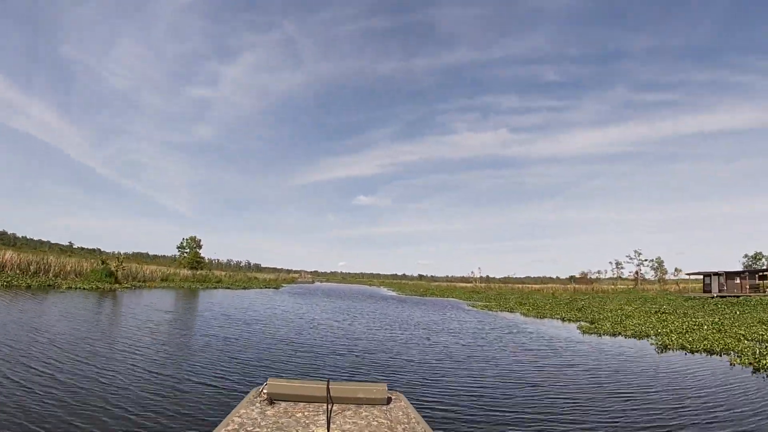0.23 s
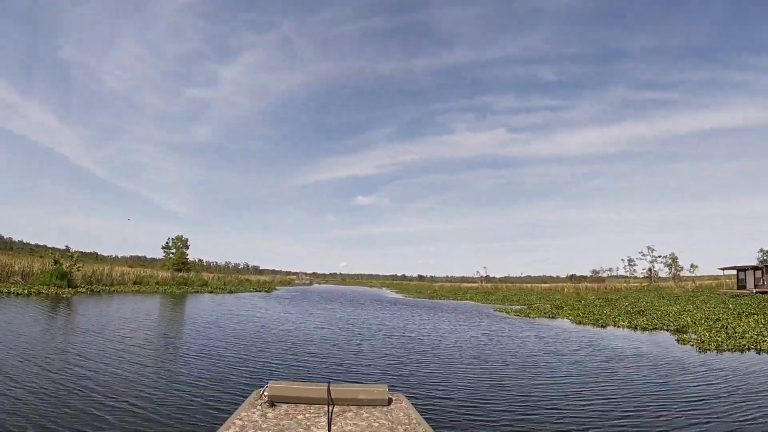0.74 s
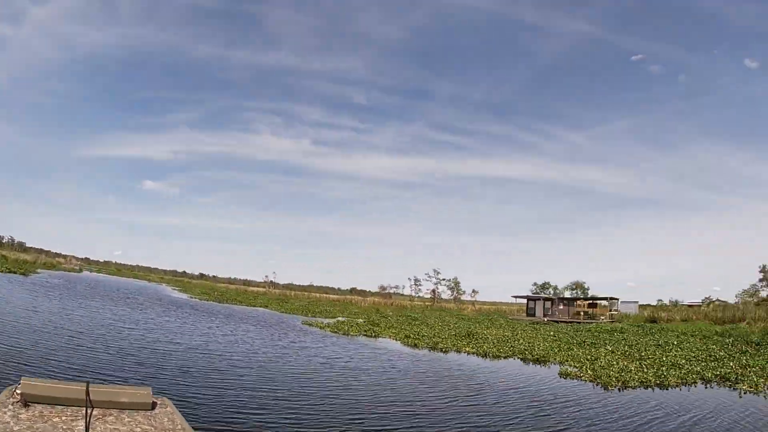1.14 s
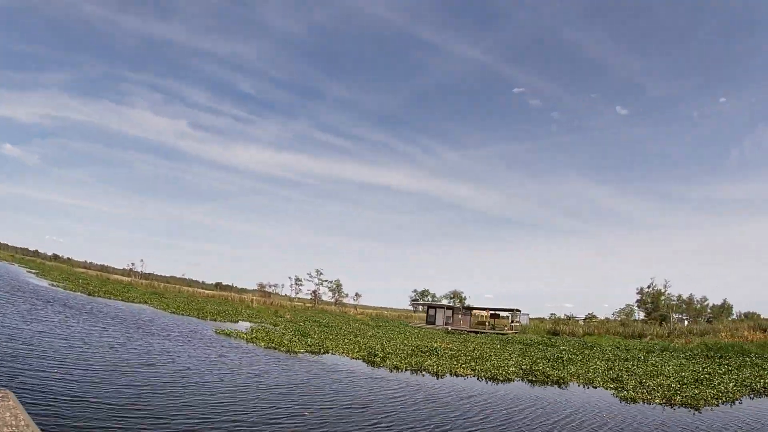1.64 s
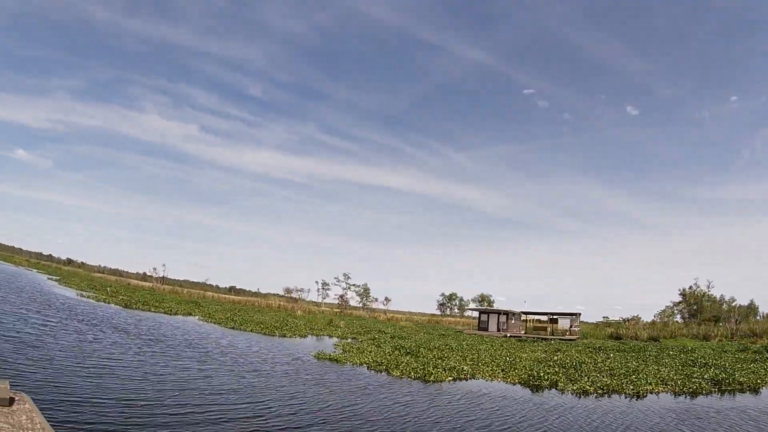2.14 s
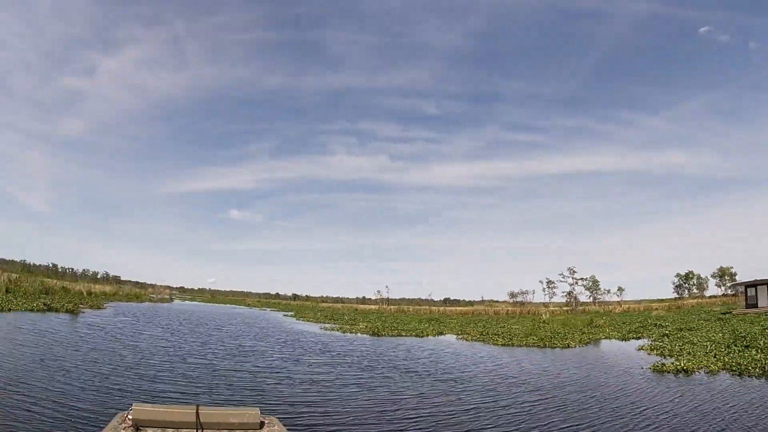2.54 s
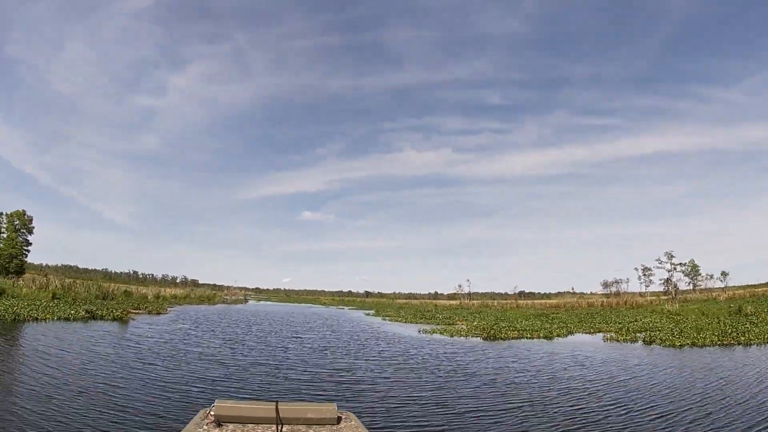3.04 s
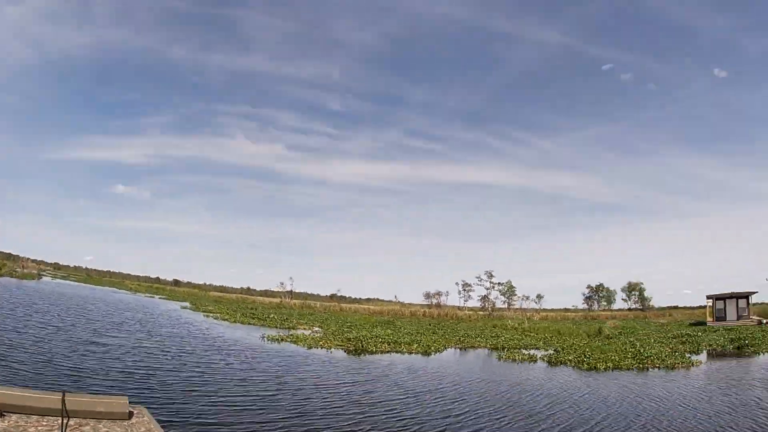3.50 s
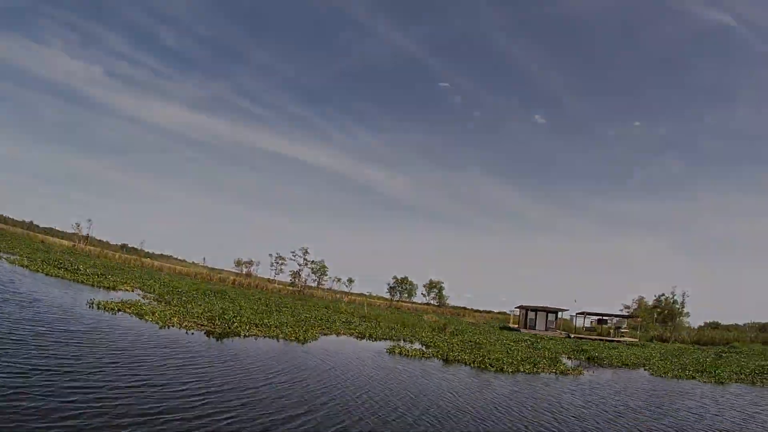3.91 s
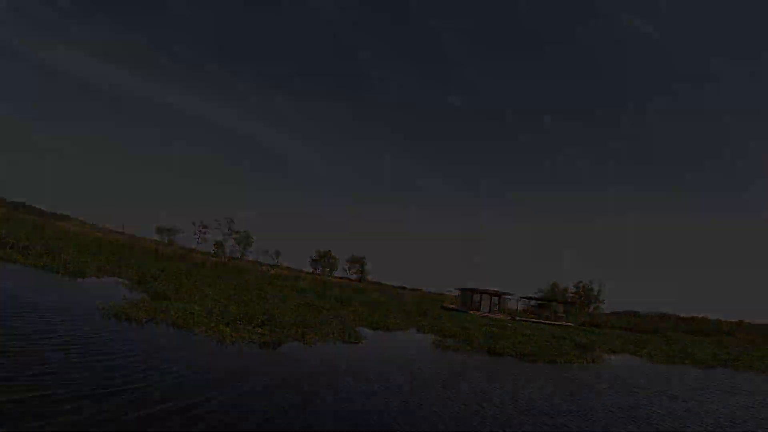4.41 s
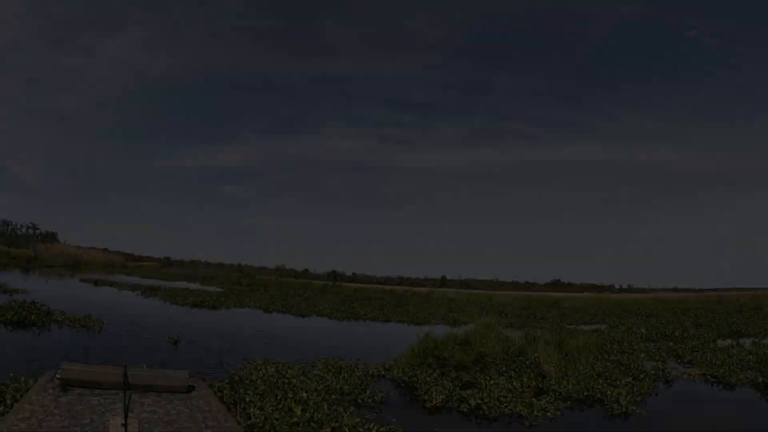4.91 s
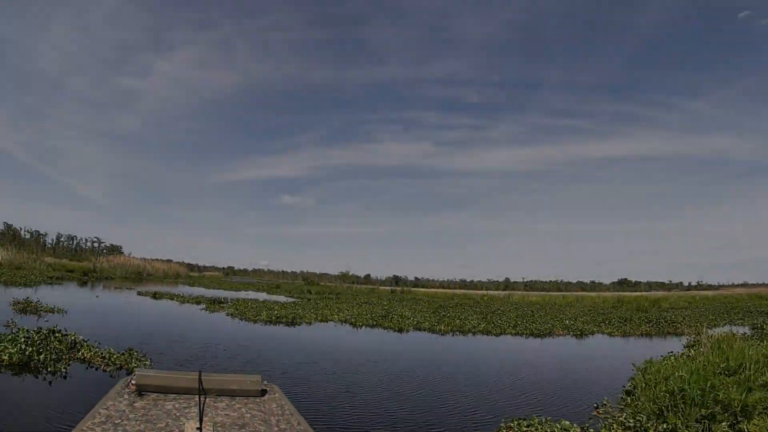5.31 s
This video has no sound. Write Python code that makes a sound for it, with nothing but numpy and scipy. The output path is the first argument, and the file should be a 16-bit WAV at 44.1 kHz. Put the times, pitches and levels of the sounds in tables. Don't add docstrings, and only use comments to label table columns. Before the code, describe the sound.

An airboat cruises over open swamp, heard from on board, close and loud. A steady low engine hum dominates, with propeller rumble, buzzing plates, soft water hiss and a very faint metallic tick. Small ripples make the hiss flutter. The spray grows near four and a half seconds, then a hard cut with a slight click brings a slightly higher, rougher drone with lighter spray.

```python
import sys
import numpy as np
from scipy import signal
from scipy.io import wavfile
from scipy.ndimage import uniform_filter1d, minimum_filter1d

SR = 44100
rng = np.random.default_rng(int(sys.argv[2]) if len(sys.argv) > 2 else 0)


def store_wav(level_fs):
    pcm = np.round(np.clip(np.atleast_2d(level_fs), -1, 1) * 32767)
    wavfile.write(sys.argv[1], SR, pcm.T.astype(np.int16))


def to_linear_factor(level_db):
    exponent = np.asarray(level_db, float) / 20
    return 10 ** exponent


N = 244755
CUT_S = 206184 / 44100

# time in seconds, pitch in Hz, level in dB.
DRONE = [
    [(0.1, 151.8, -9.0), (4.6, 151.9, -9.0)],
    [(4.72, 168.1, -9.0), (4.842, 168.4, -9.0), (4.914, 173.4, -9.0), (4.976, 173.6, -9.0),
     (5.052, 170.9, -9.0), (5.5, 170.8, -9.0)],
]
LOUDEST_ORDER = (4, 5)


def evened(x):
    return x / np.sqrt(np.mean(abs(x) ** 2) + 1e-20)


def curve(rows, t, column=1):
    table = np.transpose(rows)
    return np.interp(t, table[0], table[column])


def slow_drift(n, hz):
    points, rate = 2048, 256
    f = np.fft.fftfreq(points, 1 / rate)
    spectrum = rng.standard_normal(points) + 1j * rng.standard_normal(points)
    drift = np.fft.ifft(spectrum * np.exp(-(f / hz) ** 2))
    return np.interp(np.arange(n) * rate / SR, np.arange(points), evened(drift))


def noise(n, colour, patchy_db, gust_db, size):
    hz = np.fft.rfftfreq(size, 1 / SR)
    frames = 4 * n // size + 6
    a, b, patches = rng.standard_normal((frames, len(hz), 3)).T
    patches = uniform_filter1d(patches, size=6, axis=0)
    patches = evened(uniform_filter1d(patches, size=8, axis=1))
    gusts = evened(uniform_filter1d(rng.standard_normal(frames), size=5))
    f, db = np.transpose(colour)
    colour_db = np.interp(np.log(hz + 1), np.log(f), db)[:, None]
    field_db = colour_db + patchy_db * patches + gust_db * gusts
    sound = signal.istft((a + 1j * b) * to_linear_factor(field_db), nperseg=size, noverlap=3 * size // 4)[1]
    return evened(sound[:n])


def shaft_turns(t, stretch, phase_at_cut):
    order = LOUDEST_ORDER[stretch]
    turns = np.cumsum(curve(DRONE[stretch], t)) / order / SR
    at_cut = turns[-1] if stretch == 0 else turns[0]
    return turns + phase_at_cut / (2 * np.pi * order) - at_cut


def engine(t, turns, stretch, buzz_db):
    # multiple of the shaft speed, dB against the drone, unsteadiness (0 is steady), waver in Hz.
    orders_fast = [(3, -32, 0.7, 10), (3.5, -30, 0, 4.9), (4, -1, 0, 7), (4.5, -21, 0, 21),
                   (5, -12.5, .3, 11), (6, -20.5, 1.6, 13), (7, -36.5, 0.96, 0.57), (8, -26.5, 0.91, 5.2),
                   (8.5, -29, 0.02, 3.5), (10.5, -37.5, 1, 18), (11, -35.5, 1.47, 8), (12, -48, 0.6, 4.4),
                   (14, -39, 0.9, 10), (14.5, -39, .8, 1.1)]
    # multiple of the shaft speed, dB against the drone, unsteadiness (0 is steady), waver in Hz.
    orders_slow = [(1.8, -22.5, 1, 20), (3.7, -20.5, 0.4, 6), (4, -8.5, 0.97, 8), (5, -2, 0.2, 12),
                   (4, -7.5, .8, 16), (6, -17, 1.3, 10), (7, -27, 1.4, 10), (8, -29, 1.1, 9),
                   (9, -30, 1.2, 9), (10, -33, 1.6, 10), (12, -32, 1.5, 12), (14, -36, 1.3, 12),
                   (14, -45, 0.23, 13)]
    wobble_rad, wobble_hz = 1.87, 4.3
    loudest = LOUDEST_ORDER[stretch]
    out = np.zeros(len(t))
    for order, db, unsteady, waver_hz in (orders_fast, orders_slow)[stretch]:
        start = rng.random() * (order != loudest)
        waver = (1 + unsteady * slow_drift(len(t), waver_hz)) / np.sqrt(1 + unsteady ** 2)
        wobble = wobble_rad * min(unsteady, 0.4) * np.sqrt(2) * slow_drift(len(t), wobble_hz).real
        level_db = db + 0.9 * (buzz_db + 33.5) * (order > loudest + 2)
        phase = 2 * np.pi * (order * turns + start) + wobble
        out += to_linear_factor(level_db) * (waver * np.exp(1j * phase)).real
    return np.sqrt(2) * to_linear_factor(curve(DRONE[stretch], t, column=2) + 0.52) * out


def rasp(t, turns, level_db):
    # pitch in Hz, strength in dB per Hz.
    rasp_colour = [(120, -20.5), (250, -0.5), (330, 0.5), (430, -5), (560, -7), (680, -15), (1050, -21),
                   (1300, -29.5), (2500, -42), (5000, -88)]
    beat = 1 + 0.074 * np.cos(np.pi * turns) + 0.07 * np.cos(8 * np.pi * turns)
    return to_linear_factor(level_db + 2.5) * beat * noise(len(t), rasp_colour, patchy_db=1.0, gust_db=1.16, size=1024)


def propeller(t, stretch):
    # pitch in Hz, strength in dB per Hz.
    rumble_colour = [(20, -15.5), (50, -6), (62, -9.5), (84, 10.5), (105, -2.5), (130, 8.5), (190, 1.5),
                     (235, 3.5), (270, -14), (400, -42), (800, -90.5)]
    # pitch in Hz, strength in dB per Hz.
    roar_colour = [(250, -24), (480, -4), (700, 3), (1050, 0), (1350, -12), (2500, -44.5)]
    rumble_db = (-23.5, -23)
    roar_db = (-41.5, -41.5)
    rumble = noise(len(t), rumble_colour, patchy_db=1.5, gust_db=0.54, size=4096)
    roar = noise(len(t), roar_colour, patchy_db=0.5, gust_db=-0.4, size=1024)
    return to_linear_factor(rumble_db[stretch]) * rumble + to_linear_factor(roar_db[stretch]) * roar


def ripples(t):
    # time in seconds, change in dB.
    ripple_rows = [(.165, -3.5), (.24, 1), (.465, 3), (.67, -4), (.95, 3), (1.16, 3), (1.265, -2),
                   (1.315, 4), (1.43, 2.5), (1.69, 3), (2.03, 1.5), (2.154, 2), (2.19, -1), (2.24, 3.5),
                   (2.315, 3), (2.53, -1), (2.645, 4.5), (3.081, 2.5), (3.261, 2.5), (3.454, 5), (4.025, 3),
                   (4.19, -2), (4.361, 2), (4.42, 3), (4.47, -4.5), (4.571, 0.5), (4.62, -5), (5.05, 0.5),
                   (5.174, -1), (5.271, 1)]
    rise_s, fall_s = 0.022, 0.03
    at, db = np.transpose(ripple_rows)
    coarse = t[::64]
    lag = coarse[:, None] - at
    bells = np.exp(-(lag / np.where(lag < 0, rise_s, fall_s)) ** 2)
    return np.interp(t, coarse, bells @ db)


def spray(t, level_db):
    # pitch in Hz, strength in dB per Hz.
    spray_colour = [(300, -6), (700, 3), (1200, 1), (1800, -1), (2300, -2), (2800, 0), (3500, -5),
                    (4500, -13), (5600, -18), (6500, -25), (8000, -36), (10500, -55), (16000, -80)]
    return to_linear_factor(level_db + 4.0) * noise(len(t), spray_colour, patchy_db=0.94, gust_db=0.97, size=512)


def splash(t):
    # time in seconds, length in seconds, pitch in Hz, width in Hz, level in dB.
    puff = (2.605, .045, 1480, 350, -47)
    at, length, hz, width, db = puff
    b, a = signal.iirpeak(hz, hz / width, SR)
    water = signal.lfilter(b, a, rng.standard_normal(len(t)))
    water = evened(signal.lfilter(b, a, water))
    return to_linear_factor(db) * np.exp(-((t - at) / length) ** 2) * water


def rattle(t, level_db, stretch):
    # pitch in Hz, seconds to fade by 60 dB, level in dB in the first and in the second stretch.
    rings = [(9800, .009, 0, 0), (8100, .009, -12, 0), (5600, .009, -3, -6)]
    # pitch in Hz, strength in dB per Hz.
    fizz_colour = [(2000, -10), (4000, 6), (5600, 8), (7000, 1), (10300, -1), (10700, -11), (12000, -17),
                   (16000, -26)]
    knocks_per_s = 90
    hits = rng.random(len(t)) < knocks_per_s / SR
    ticks = hits * to_linear_factor(4.0 * np.minimum(rng.exponential(1, len(t)), 4))
    u = np.arange(1000) / SR
    ring = np.zeros(len(u))
    for row in rings:
        ring += to_linear_factor(row[2 + stretch] - 60 * u / row[1]) * np.sin(2 * np.pi * row[0] * u)
    ring *= np.minimum(u / 0.0004, 1)
    rung = evened(signal.oaconvolve(ticks, ring)[:len(t)])
    fizz = noise(len(t), fizz_colour, patchy_db=-2.0, gust_db=3.1, size=256)
    return to_linear_factor(level_db) * (to_linear_factor(-2.0) * rung + to_linear_factor(7.5) * fizz)


def ride(t, stretch, phase_at_cut):
    # time in seconds, rasp level in dB.
    buzz = [
        [(0, -34.5), (.35, -29), (1.29, -30), (1.38, -34), (2.05, -37), (2.25, -35.5), (3.65, -33),
         (3.9, -38.5), (4.6, -38)],
        [(4.72, -31), (5.15, -33), (5.5, -30)],
    ]
    # time in seconds, spray level in dB.
    wash = [
        [(0, -47), (1.25, -49.5), (1.35, -47), (2.1, -44.5), (2.35, -45.5), (2.9, -48), (3.4, -48.5),
         (4.0, -44.5), (4.2, -43), (4.4, -41), (4.67, -36.5)],
        [(4.7, -51.5), (4.95, -47.5), (5.15, -50.5), (5.35, -48.5), (5.54, -49)],
    ]
    rattle_base_db = (-75.5, -70)
    turns = shaft_turns(t, stretch, phase_at_cut)
    buzz_db = curve(buzz[stretch], t)
    wash_db = curve(wash[stretch], t)
    ripple_db = ripples(t)
    shake_db = 0.22 * (buzz_db - buzz_db.mean()) + 0.1 * (wash_db - wash_db.mean())
    rattle_db = rattle_base_db[stretch] + shake_db + 0.68 * ripple_db
    motor = engine(t, turns, stretch, buzz_db) + rasp(t, turns, buzz_db + 0.4 * ripple_db)
    water = spray(t, wash_db + ripple_db)
    return motor + propeller(t, stretch) + water + rattle(t, rattle_db, stretch)


def scene():
    t, cut = np.arange(N) / SR, round(CUT_S * SR)
    first = ride(t[:cut], 0, phase_at_cut=0.45)
    second = ride(t[cut:], 1, phase_at_cut=-0.6)
    first *= np.clip(0.6 + (CUT_S - t[:cut]) / 0.0007, 0, 1)
    second *= np.clip(0.05 + (t[cut:] - CUT_S) / 0.0067, 0, 1)
    edges = np.clip(0.3 + np.minimum(t, t[-1] - t + 0.0004) / 0.002, 0, 1)
    return (edges * (np.concatenate([first, second]) + splash(t)))[None]


def low_pass(x):
    return signal.sosfilt(signal.butter(12, 15830, fs=SR, output="sos"), x)


def record(dry):
    crest = -minimum_filter1d(-abs(dry), size=600)
    gain = np.minimum(0.6 / (crest + 1e-9), 1) ** 0.8
    gain = uniform_filter1d(gain, size=500)
    return low_pass(dry * gain)


dry = scene()
out = record(dry)
store_wav(out)
```